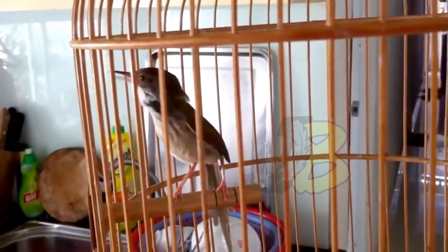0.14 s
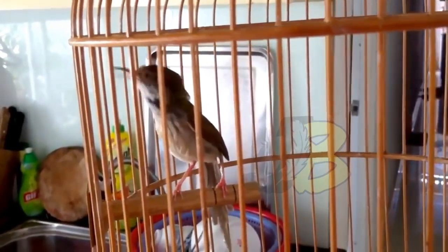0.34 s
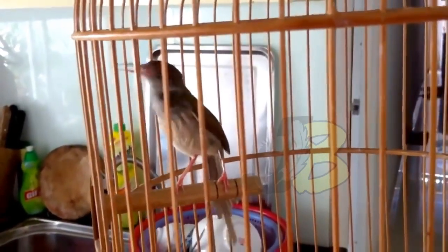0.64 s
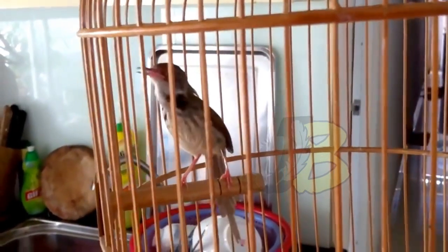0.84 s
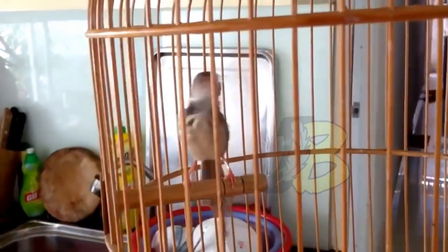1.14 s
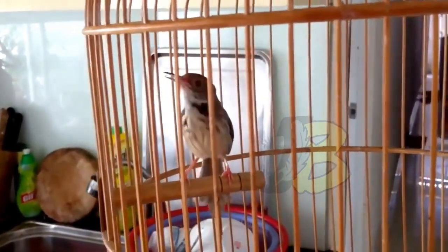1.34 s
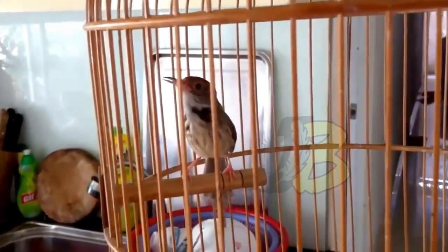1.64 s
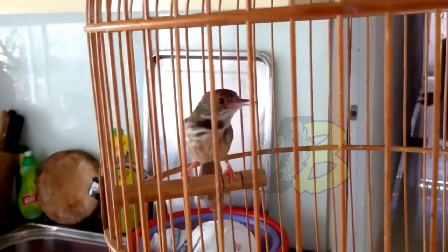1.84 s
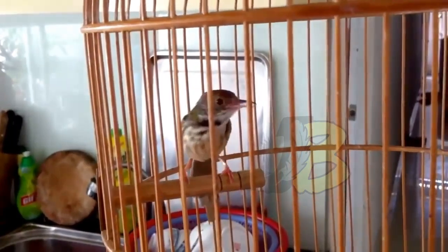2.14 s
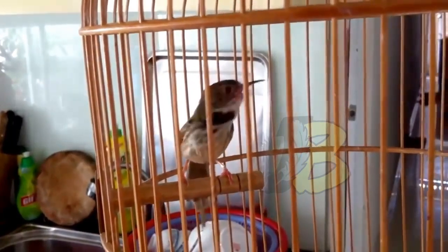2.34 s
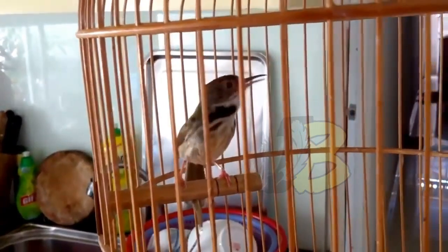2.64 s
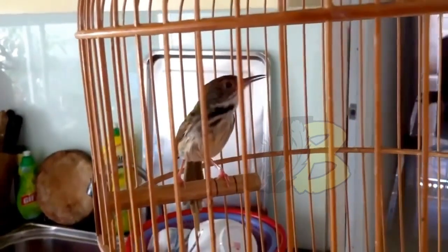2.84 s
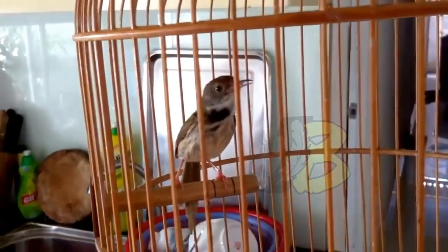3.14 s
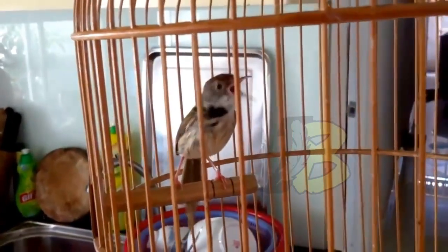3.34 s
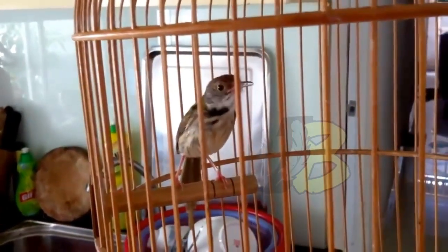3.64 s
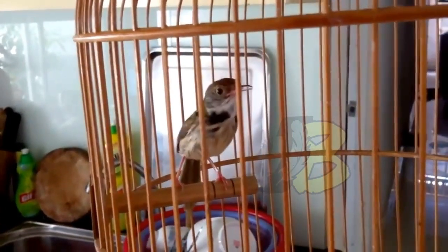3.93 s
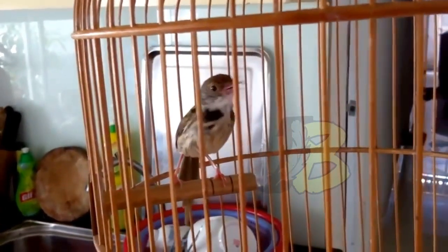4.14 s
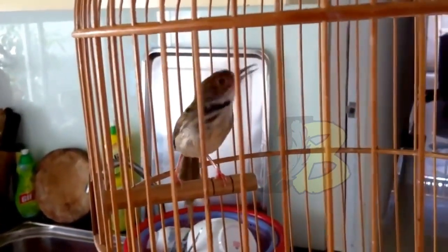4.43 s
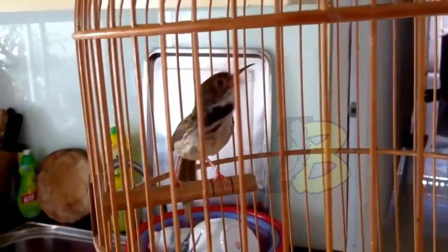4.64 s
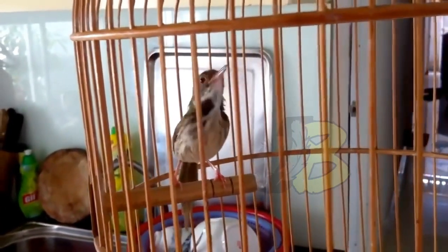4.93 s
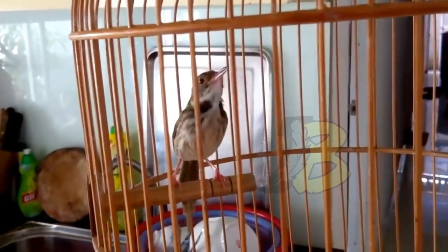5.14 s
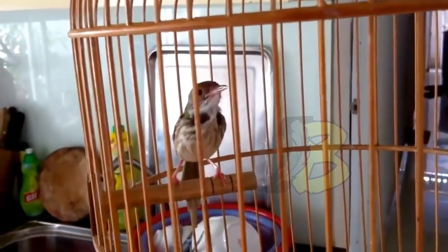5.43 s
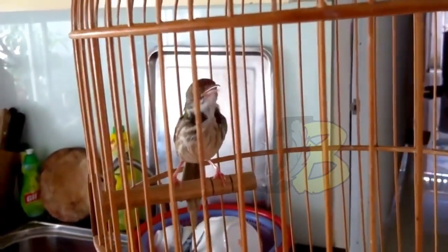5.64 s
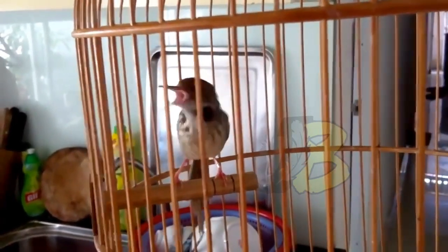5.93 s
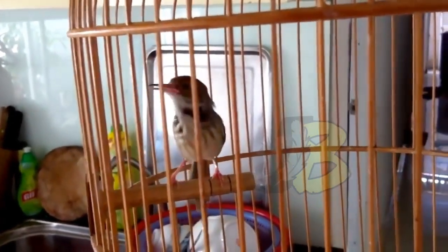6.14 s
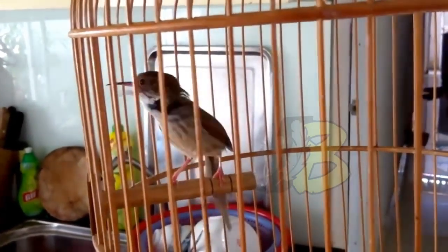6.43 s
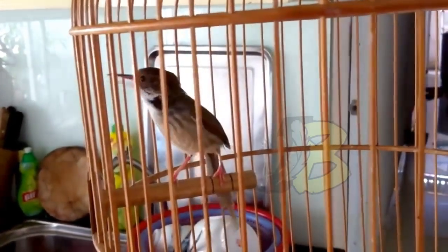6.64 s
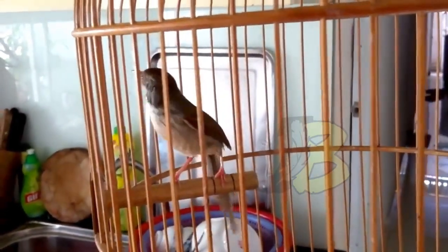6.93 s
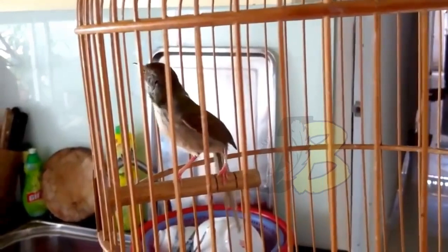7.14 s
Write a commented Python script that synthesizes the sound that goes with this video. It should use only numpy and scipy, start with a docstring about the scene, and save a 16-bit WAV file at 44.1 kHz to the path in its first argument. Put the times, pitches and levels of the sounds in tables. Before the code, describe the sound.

Loud, steady two-note birdsong in a hard-walled kitchen: piercing downward chip, gentler up-and-down whistle, repeated without pause over very quiet air.

```python
"""The ring of notes just sung fades first; then a small caged songbird, close to the microphone in a kitchen, repeats
a two-note phrase nearly three times a second: a sharp falling chip, then a softer whistle that climbs and drops.
Both are glides of one harmonic syrinx tone; the throat favours its second harmonic in the chip and its fundamental
in the whistle. Decaying noise makes the hard room ring after every note; faint far whistles and still air lie behind."""
import sys
import numpy as np
from scipy import signal
from scipy.fft import rfft, irfft
from scipy.io import wavfile
from scipy.ndimage import uniform_filter1d, minimum_filter1d

SR = 44100
rng = np.random.default_rng(int(sys.argv[2]) if len(sys.argv) > 2 else 0)


def store_pcm(level_fs):
    """Save levels as 16-bit WAV."""
    pcm = np.round(np.clip(level_fs, -1, 1) * 32767).astype(np.int16)
    wavfile.write(sys.argv[1], SR, np.atleast_2d(pcm).T)


N = 321048
LEAD_S = 0.3  # tracks begin this early, so that notes begun before the start still ring
OPPOSITE = np.array([[1], [-1]])  # a side signal has opposite sign in the two channels


def undb(db):
    """Level and amplitude: 20 dB is a tenfold gain."""
    return 10 ** (np.asarray(db) / 20)


def lookup(x, table):
    """Linear interpolation: every further column of a table, read at x along its first column."""
    first, *columns = np.transpose(table)
    return [np.interp(x, first, column) for column in columns]


def noise(size, spectrum):
    """Spectral shaping: white noise weighted by (Hz, dB) points, then scaled to an rms of 1."""
    hz = np.arange(size // 2 + 1) * SR / size
    gain = undb(lookup(hz, spectrum)[0])
    shaped = irfft(rfft(rng.standard_normal(size)) * gain, size)
    return shaped / shaped.std()


def add(track, start_s, sound):
    """Superposition: mix a stereo sound into a track that begins LEAD_S early."""
    first = max(int((start_s + LEAD_S) * SR), 0)
    part = sound[:, :max(track.shape[1] - first, 0)]
    track[:, first:first + part.shape[1]] += part


def room_air():
    """Stationary broadband noise: still air, nearly equal in both channels."""
    # Each row: frequency in Hz, relative spectral density in dB per Hz.
    air_spectrum = [(30, -14.5), (100, -8), (280, 4.5), (600, -6.5), (1500, -11.5), (5000, -10),
                    (16000, -16.5)]
    mid = undb(-86) * noise(N, air_spectrum)
    side = undb(-108) * noise(N, air_spectrum)
    return mid + side * OPPOSITE


def reflections(size=256, count=220):
    """Diffuse reverberation: two unrelated noise tails, each band decaying exponentially at its own rate."""
    # Ring of the kitchen. Each row: frequency in Hz, time to decay by 60 dB in s, relative level in dB.
    ring_bands = [(2000, 0.29, 1), (3060, 0.3, 3), (3230, 0.33, 1.5), (3316, 0.35, 0), (3534, 0.28, -3),
                  (4140, 0.42, -0.5), (4640, 0.31, 0.5), (4660, 0.31, -3), (5740, 0.48, -4.5),
                  (7400, 0.37, -2), (14100, 0.28, -4)]
    hop = size // 2
    t60, db = lookup(np.arange(hop + 1) * SR / size, ring_bands)
    t = np.arange(count) * hop / SR
    fade = undb(db[:, None] - 60 * t / t60[:, None])
    white = rng.standard_normal((2, (count - 1) * hop))
    bins = signal.stft(white, nperseg=size)[2]
    return signal.istft(bins * fade, nperseg=size)[1] / np.sqrt(SR)


def kitchen(note, walls, wet_db, moved=0.7, side_db=-18, build_s=0.0016):
    """Convolution with a room response; the bird moves, so part of the reflection pattern is new each time."""
    pattern = np.sqrt(1 - moved) * walls + np.sqrt(moved) * reflections()
    mid, side = undb(wet_db) * pattern
    build = 1 - np.exp(-np.arange(len(mid)) / SR / build_s)
    response = (mid + undb(side_db) * side * OPPOSITE) * build
    return signal.fftconvolve(note[None], response, axes=1)


def far_calls(walls, waver=0.021):
    """Reverberant field without direct sound: soft wavering whistles from far off."""
    # Each row: start in s, length in s, mean pitch in Hz, level before reverberation in dB.
    call_rows = [(0.717, 0.12, 1490, -72.5), (0.755, .09, 1950, -72.5), (0.864, 0.027, 2480, -45.5),
                 (0.886, 0.051, 2064, -51), (2.591, 0.052, 1983, -57), (4.175, 0.092, 1850, -78),
                 (4.416, 0.08, 1608, -69)]
    track = np.zeros((2, N + int(LEAD_S * SR)))
    for start, length, hz, db in call_rows:
        t = np.arange(int(length * SR)) / SR
        pitch = hz * (1 + waver * noise(len(t), [(0, -5), (80, -6), (400, -58)]))
        tone = np.sin(2 * np.pi * np.cumsum(pitch) / SR)
        note = undb(db) * np.sin(np.pi * t / length) * tone
        add(track, start, kitchen(note, walls, wet_db=29.5))
    return track[:, -N:]


def clock(total_ms, length):
    """Time scaling: milliseconds into a note, running slower when the note is drawn out."""
    count = int(total_ms * length * SR / 1000)
    return np.arange(count) * 1000 / SR / length


def envelope(ms, attack_ms, hold_ms, release_ms, power):
    """Amplitude envelope of the effort: a swell shaped by `power`, a hold, a straight release."""
    swell = (ms / attack_ms).clip(0, 1) ** power
    release = ((attack_ms + hold_ms + release_ms - ms) / release_ms).clip(0, 1)
    return swell * release


def bill_turn(time_s):
    """Source orientation: where the bill points, interpolated between known moments."""
    # Each row: time in s, turn of the bill from -1 (left) to 1 (right).
    turn_points = [(0, -.8), (1.7, -0.79), (2.4, 1), (3.4, -0.097), (4.8, 0.41), (5.3, -0.28), (6.2, -0.77),
                   (7.2, -0.57)]
    return lookup(time_s, turn_points)[0]


def syrinx(hz, force, turn, harmonics, overtone_db, overtone_fall_db, rough_db, rush_db, rasp_db, ragged,
           order, waver=0.005, tremble_hz=600):
    """Harmonic source and throat filter: a glide as (tone, overtones), with harmonic `order` the loud one."""
    # Colour of the overtones as they leave the bill. Each row: frequency in Hz, relative level in dB.
    bill_colour = [(2000, -2.5), (2500, -4), (3100, -18), (4500, -2.5), (6700, -2), (7300, -11), (8000, -3),
                   (9200, 4), (10000, -2.5), (10800, -14.5), (12000, 2), (13000, -12.5), (14300, 3.5),
                   (15300, 3)]
    n = len(hz)
    f0 = hz / order * (1 + waver * noise(n, [(0, 4.5), (300, -3), (1200, -58)]))
    phase = 2 * np.pi * np.cumsum(f0) / SR

    # The membranes tremble a little, and air rushes in the band that the throat is tuned to.
    tremble_spectrum = [(0, 0), (tremble_hz, -6), (2 * tremble_hz, -30), (5000, -70)]
    tremble = 1 + undb(rough_db) * noise(n, tremble_spectrum)
    low, high = hz.min(), hz.max()
    rush_spectrum = [(0, -70), (0.95 * low, -45), (low, 0), (high, 0), (1.2 * high, -45), (SR / 2, -70)]
    tone = np.sin(order * phase) * tremble + undb(rush_db) * noise(n, rush_spectrum)

    # Turning to the right lifts the overtones as a whole, while the very highest are beamed away.
    highest_db = 1 - 1.5 * turn
    bill = [(f, level + highest_db * (f > 11000)) for f, level in bill_colour]
    leak_db = overtone_db + 2.5 * turn - overtone_fall_db * np.arange(n) / n

    # The overtones are ragged: a hiss rides on them and their phase wanders.
    hiss_spectrum = [(0, -40), (7500, -30)] + [point for point in bill if point[0] > 7700]
    overtones = undb(rasp_db) * noise(n, hiss_spectrum)
    for k, (_, level_db) in enumerate(harmonics, 1):
        if k != order:
            wander = ragged * k * noise(n, [(0, -2), (250, -8.5), (900, -58)])
            gain = undb(level_db + lookup(k * f0, bill)[0])
            audible = k * f0 < SR / 2  # no aliasing
            overtones = overtones + gain * audible * np.sin(k * phase + wander)
    return force * tone, force * undb(leak_db) * overtones


def flutter(note, db, side_db=-24):
    """Noise modulated by short-time power: a very faint dull flutter, strongest where the note is loudest."""
    spectrum = [(0, -8), (200, -6), (800, -4.5), (2000, -3), (4000, -11.5), (8000, -39)]
    power = uniform_filter1d(note ** 2, size=128)
    mid, side = noise(len(note), spectrum), noise(len(note), spectrum)
    return undb(db) * power * (mid + undb(side_db) * side * OPPOSITE)


def sing(voice, walls, wet_db, side_db, beam_db, flutter_db):
    """Directivity: the bill beams the overtones aside, so they arrive mostly by way of the walls."""
    tone, overtones = voice
    heard = kitchen(tone + overtones, walls, wet_db, side_db=side_db)
    direct = tone + undb(beam_db) * overtones + flutter(tone, flutter_db)
    heard[:, :len(tone)] += direct
    return heard


def whistle(length, accent_db):
    """Resonance: pitch and force of the climbing and dropping note, lifted where it meets the throat's tuning."""
    # Times are for a length factor of 1.
    attack_ms, hold_ms, release_ms = 49.2, 31.7, 20.9
    start_hz, rest_hz, creep_ms = 1956, 2540, 45
    top_hz, crest_ms, leap_ms, sink_ms = 3404, 57.5, 10.3, 17.5
    throat_hz, throat_width_hz, throat_db = 3420, 125, 8
    ms = clock(attack_ms + hold_ms + release_ms, length)

    # The pitch creeps towards rest; on top of that it leaps to a crest and sinks back.
    base = rest_hz + (start_hz - rest_hz) * np.exp(-ms / creep_ms)
    past = ms - crest_ms
    leap = np.exp(-0.5 * (past / leap_ms) ** 2)
    sink = 1 / (1 + (past / sink_ms) ** 2)
    hz = base + (top_hz - base) * np.where(past < 0, leap, sink)

    # An accent goes mostly into the resonance, only a share of it into the whole whistle.
    in_tune = np.exp(-0.5 * ((hz - throat_hz) / throat_width_hz) ** 2)
    db = -12.5 + 0.44 * accent_db + (throat_db + accent_db) * in_tune
    return hz, envelope(ms, attack_ms, hold_ms, release_ms, power=1.223) * undb(db)


def chip(length, top_hz, db):
    """Frequency glide: pitch (of the loud second harmonic) and force of the sharp falling note."""
    # Times are for a length factor of 1.
    attack_ms, hold_ms, release_ms = 19.14, 19.8, 9.8
    scoop_hz, scoop_ms = 680, 2
    low_hz, fall_at_ms, fall_ms = 3886, 21.12, 3.7
    ms = clock(attack_ms + hold_ms + release_ms, length)

    # The pitch scoops up towards its top, then falls along an S-curve towards a fixed low pitch.
    high = 1 / (1 + np.exp((ms - fall_at_ms) / fall_ms))
    scoop = scoop_hz * np.exp(-ms / scoop_ms)
    hz = low_hz + (top_hz - low_hz) * high - scoop

    # The effort swells, sags as the pitch drops (0.44 dB per ms), and is cut off.
    sag_db = 0.44 * (ms - attack_ms).clip(0)
    return hz, envelope(ms, attack_ms, hold_ms, release_ms, power=0.9) * undb(-3 + db - sag_db)


def song(walls):
    """Direct and reverberant sound together: chips and whistles in turn, each ringing in the room."""
    # Each row: start in s, length factor, top pitch in Hz, relative level in dB, relative flutter level in dB.
    chip_rows = [(-0.215, 1.9, 6210, -6.5, -3), (0.143, 0.98, 6155, 0.5, -11),
                 (0.5006, 1.02, 6110, 0.4, -1), (0.8578, 1.03, 6104, -0.1, 8.5),
                 (1.2284, 0.99, 6150.0, 0.3, 4.5), (1.5994, 1.02, 6116, 0.9, 0),
                 (1.973, 0.96, 6150, 0.6, 3.5), (2.3591, 0.98, 6243, -0.55, 3.5),
                 (2.7398, 1.03, 6200.0, -0.6, 2), (3.1163, 1.03, 6236, 0.6, 5),
                 (3.5102, 0.96, 6175, -0.5, 1.5), (3.8974, 1, 6166, -0.9, 4),
                 (4.2845, 0.99, 6165, -1.2, 0.5), (4.6593, 1.03, 6156, -1.3, -3.5),
                 (5.0233, 1.1, 6170, 0.2, 4.5), (5.3857, 0.99, 6190, -0.8, 3),
                 (5.7494, 1.01, 6125, -0.1, -3), (6.121, 1, 6133, -0.36, -2.5),
                 (6.4869, 0.96, 6135, 0, -19), (6.8476, 1.01, 6117, -0.36, -3),
                 (7.1996, 1.07, 6153, 0.4, 3)]
    # Each row: start in s, length factor, accent in dB.
    whistle_rows = [(-0.115, 0.91, 0.5), (0.2435, 1, 2), (0.6016, 1, 3), (0.9598, 1.002, 1),
                    (1.3318, 0.99, 2), (1.7057, 1.0, 0.5), (2.0774, 1.02, 0.0), (2.4637, 1.056, -1.5),
                    (2.8454, 1.08, -0.5), (3.2239, 1.003, -0.2), (3.6211, 0.97, -4), (4.0053, 0.96, -1.5),
                    (4.3911, 0.97, -2.5), (4.7638, 1.012, -1), (5.1261, 1.014, 1), (5.491, 1.02, -1.0),
                    (5.8529, 1.04, 0), (6.2263, 0.95, -0.5), (6.5869, 1.02, 0.5), (6.9505, 1.008, 3)]
    # Harmonics of the syrinx tone. Each row: multiple of the fundamental, relative level in dB.
    chip_harmonics = [(1, -33), (2, 0), (3, -26.5), (4, -19.5), (5, -25.5), (6, -21), (7, -34), (8, -40)]
    whistle_harmonics = [(1, 0), (2, -25.5), (3, -28), (4, -34), (5, -38.5), (6, -53.5)]

    track = np.zeros((2, N + int(LEAD_S * SR)))
    for start, length, top_hz, db, flutter_db in chip_rows:
        hz, force = chip(length, top_hz, db)
        voice = syrinx(hz, force, bill_turn(start), chip_harmonics, overtone_db=-0.1, overtone_fall_db=16,
                       rough_db=-26, rush_db=-22.5, rasp_db=-35, ragged=0.25, order=2)
        note = sing(voice, walls, wet_db=13.5, side_db=-23, beam_db=-4, flutter_db=flutter_db - 44)
        add(track, start, note)
    for start, length, accent_db in whistle_rows:
        hz, force = whistle(length, accent_db)
        voice = syrinx(hz, force, bill_turn(start), whistle_harmonics, overtone_db=1.4, overtone_fall_db=12.5,
                       rough_db=-27.5, rush_db=-32.5, rasp_db=-51.5, ragged=0.43, order=1)
        note = sing(voice, walls, wet_db=11.5, side_db=-25, beam_db=-5, flutter_db=2 * accent_db - 55.5)
        add(track, start, note)
    return track[:, -N:]


def scene():
    """Superposition of the almost silent room, the far whistles and the bird."""
    walls = reflections()
    return room_air() + far_calls(walls) + song(walls)


def suppress(x, depth_db=-13, size=512):
    """Spectral gating: faint bands are turned down, which shortens the end of every tail."""
    # Each row: frequency in Hz, level in dB under which a band is turned down.
    thresholds = [(0, -130), (900, -125), (1400, -99), (2000, -69.5), (2900, -57), (3400, -54), (4000, -62),
                  (5000, -59), (5900, -82), (7300, -72.5), (9000, -82.5), (15000, -80)]
    hz, _, bins = signal.stft(x, SR, nperseg=size)
    mid_power = np.abs(bins.mean(axis=0)) ** 2
    power = uniform_filter1d(mid_power, size=3, axis=1).clip(0)
    threshold = undb(lookup(hz, thresholds)[0])[:, None]
    opening = power / (power + threshold ** 2)
    gain = opening + (1 - opening) * undb(depth_db)
    return signal.istft(bins * gain, nperseg=size)[1][:, :N]


def record(dry, ceiling=1.0, size=65):
    """Dynamics and band limiting: noise suppressor, fast peak limiter, then a steep low-pass at 15.7 kHz."""
    x = suppress(dry)
    gain = np.minimum(1, ceiling / (np.abs(x).max(axis=0) + 1e-9))
    gain = minimum_filter1d(gain, 2 * size)  # turned down shortly before and after each peak
    gain = uniform_filter1d(uniform_filter1d(gain, size), size)
    low_pass = signal.ellip(10, 0.2, 70, 15700, fs=SR, output="sos")
    return signal.sosfilt(low_pass, x * gain)


dry = scene()
out = record(dry)
store_pcm(out)
```